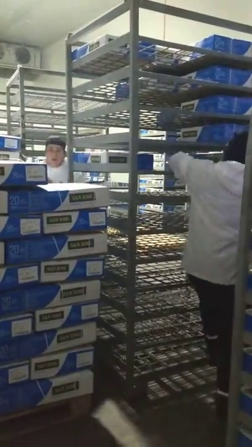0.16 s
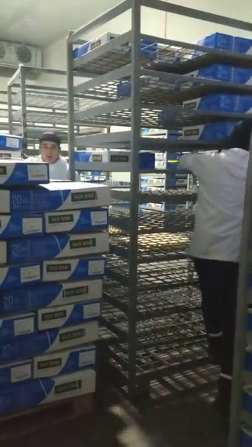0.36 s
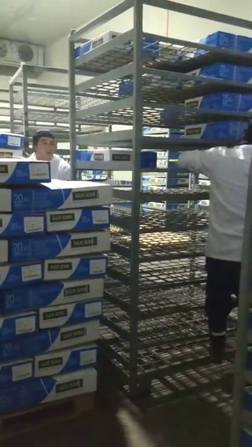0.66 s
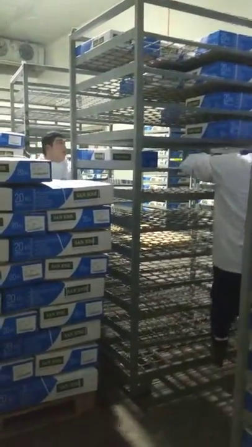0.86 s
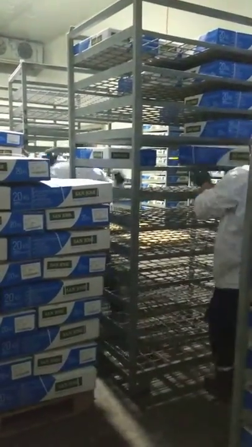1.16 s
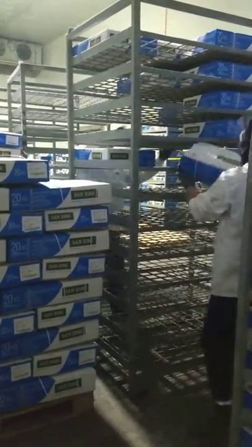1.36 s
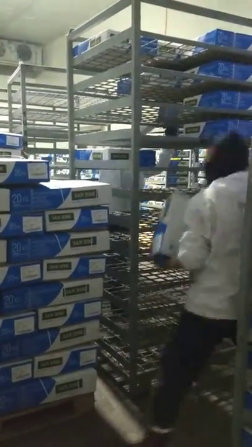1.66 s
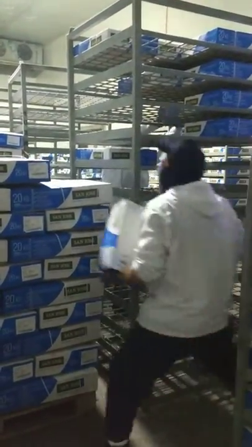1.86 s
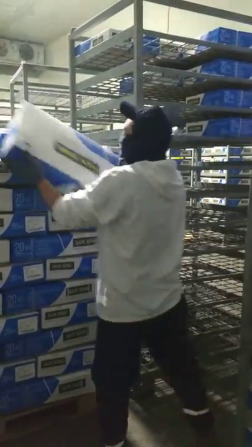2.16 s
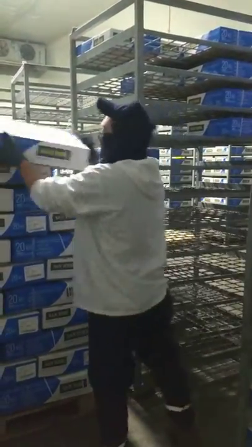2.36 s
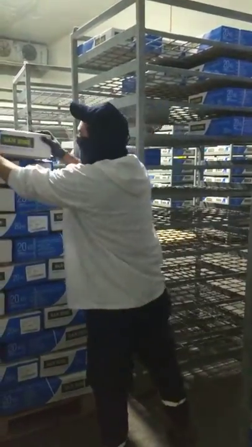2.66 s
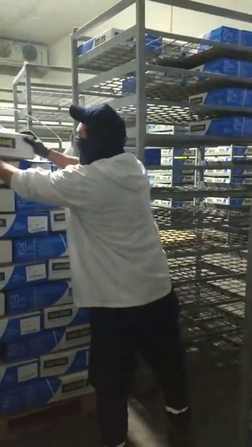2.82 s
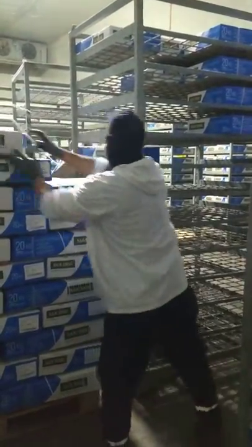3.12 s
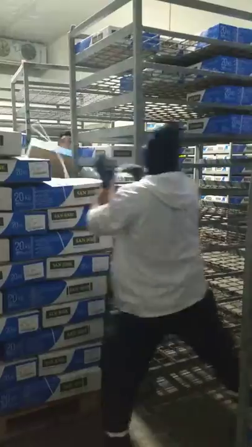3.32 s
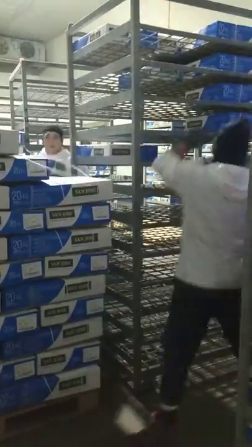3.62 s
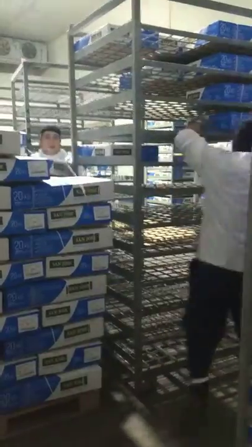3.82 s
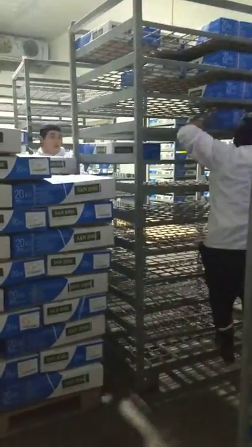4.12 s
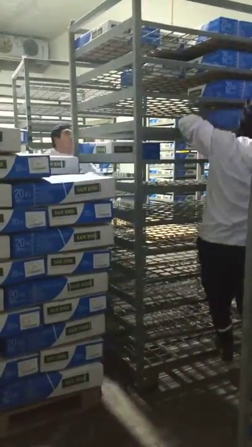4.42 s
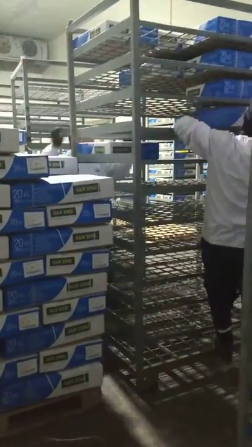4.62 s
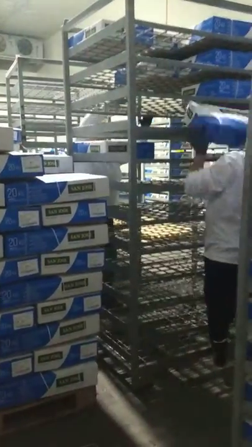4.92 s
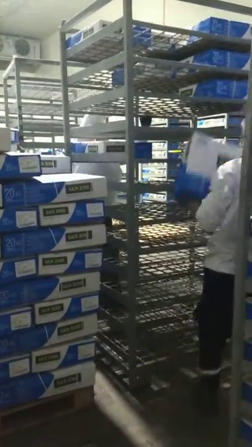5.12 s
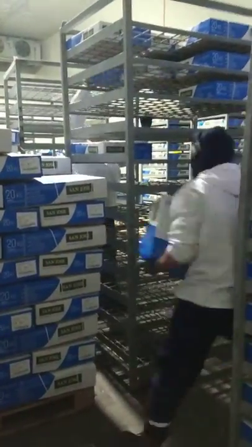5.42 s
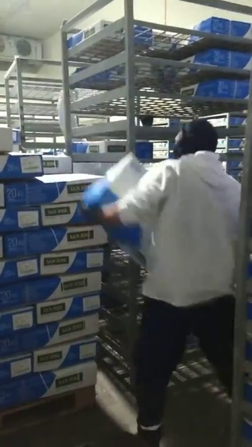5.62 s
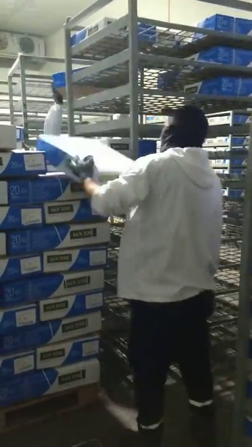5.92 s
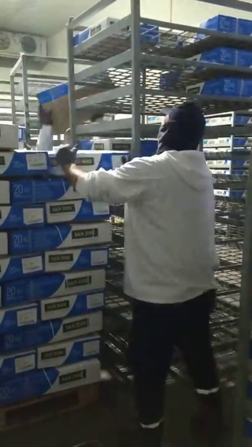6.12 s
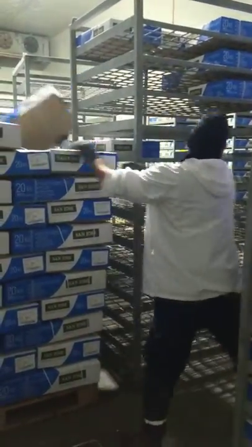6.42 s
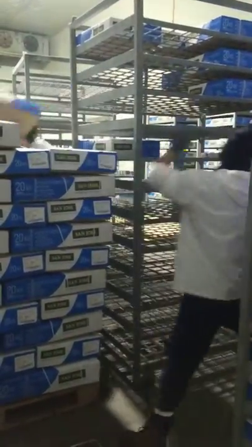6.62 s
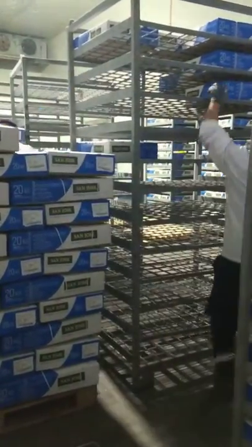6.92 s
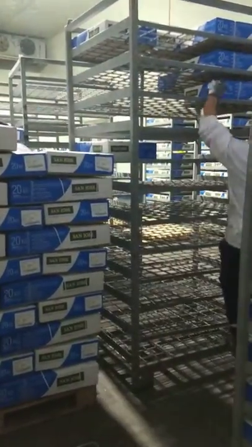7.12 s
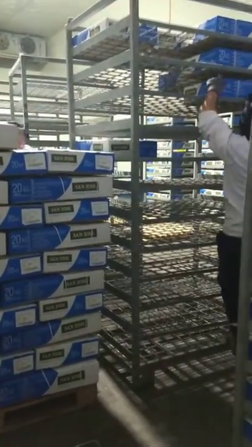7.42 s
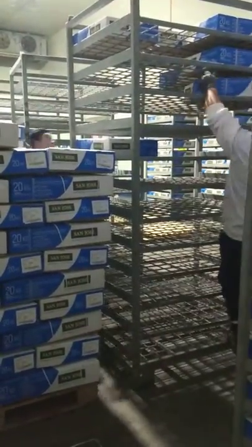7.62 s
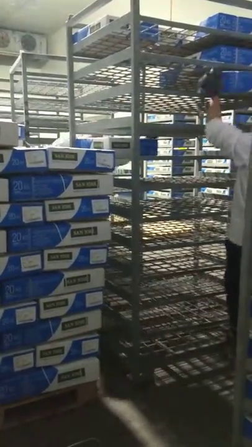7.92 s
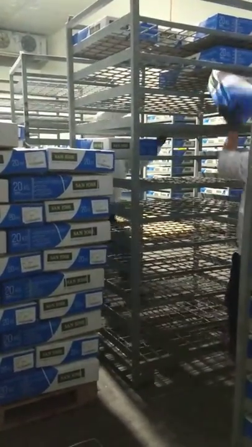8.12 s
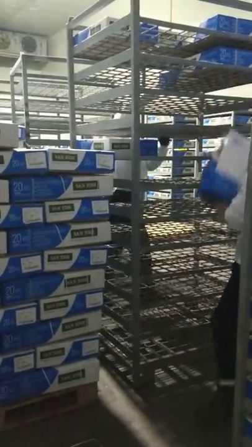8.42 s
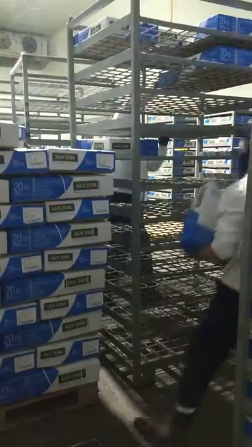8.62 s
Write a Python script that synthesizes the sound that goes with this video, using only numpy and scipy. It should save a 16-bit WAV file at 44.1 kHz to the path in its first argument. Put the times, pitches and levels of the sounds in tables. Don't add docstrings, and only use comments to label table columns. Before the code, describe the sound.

Workers' frozen boxes are dragged, knocked and stacked near a handheld phone. Brittle ice ticks, cardboard slaps and gritty scuffs lead to clumps of low thuds, the loudest around 2.5 and 6.8 seconds. A taut strap squeaks thinly after the first heavy landing. Steady evaporator fans hum and whoosh behind, dipping briefly after loud blows, while the metal room adds a short, hard ring.

```python
import sys
import numpy as np
from scipy import signal
from scipy.fft import rfft, irfft, next_fast_len
from scipy.io import wavfile
from scipy.ndimage import map_coordinates

SR = 44100
rng = np.random.default_rng(int(sys.argv[2]) if len(sys.argv) > 2 else 0)


def to_linear_factor(level_db):
    exponent = np.asarray(level_db, float) / 20
    return 10 ** exponent


def store_pcm(level_fs):
    pcm = np.round(np.clip(level_fs, -1, 1) * 32767).astype(np.int16)
    wavfile.write(sys.argv[1], SR, np.atleast_2d(pcm).T)


N = 386757


def unit(x):
    return x / np.sqrt(np.mean(x ** 2) + 1e-20)


def along(points, hz):
    f, *cols = np.transpose(points)
    return np.squeeze([np.interp(np.log(hz + 1), np.log(f + 1), c) for c in cols])


def curves(rows):
    s, *cols = np.transpose(rows)
    return [np.interp(np.arange(N) / SR, s, c) for c in cols]


def wobble(rate, size=N):
    at = np.arange(0, size + 8, 8)
    knots = rng.standard_normal(int(size * rate / SR) + 4)
    return np.interp(np.arange(size), at, map_coordinates(knots, [at * rate / SR]))


def filtered(x, response):
    m = next_fast_len(N + 8192)
    return irfft(rfft(x, m) * response(np.fft.rfftfreq(m, 1 / SR)), m)[..., :N]


def noise(spectrum):
    m = next_fast_len(N)
    hz = np.fft.rfftfreq(m, 1 / SR)
    re, im = rng.standard_normal((2, 2, len(hz)))
    return unit(irfft((re + 1j * im) * to_linear_factor(along(spectrum, hz)), m)[:, :N])


def tone(hz, width_hz, steady=0):
    size = len(hz)
    phase = 2 * np.pi * np.cumsum(hz) / SR
    cos, sin = np.cos(phase), np.sin(phase)
    pair = [cos * (steady + wobble(width_hz, size)) + sin * wobble(width_hz, size) for _ in range(2)]
    return unit(np.array(pair))


# start_s, level_db, pitch_hz, t60_s
THUDS = [(.5434, -15.5, 670, 0.033), (.852, -9, 218, 0.064), (.94, -16, 303, .05), (1.571, -10, 570, 0.039),
         (1.582, -7.5, 227, 0.06), (1.589, -14.5, 640, 0.062), (1.609, -8.5, 250, 0.04),
         (1.642, -11, 313, 0.069), (2.315, -11, 250, 0.073), (2.455, -15, 1160, .03),
         (2.4573, -8, 1550, 0.029), (2.466, -6.5, 300, 0.092), (2.474, -9, 275, 0.089),
         (2.4945, -14, 330, 0.033), (2.508, -8.5, 418, 0.056), (3.643, -11.5, 924, 0.027),
         (3.69, -7, 199, 0.044), (4.991, -14.5, 433, 0.37), (5.015, -13.5, 293.2, 0.34),
         (6.021, -8, 310, 0.036), (6.335, -18, 353, 0.33), (6.359, -15, 285, 0.083), (6.39, -22, 229, 0.33),
         (6.796, -16, 229, .06), (6.806, -8.5, 189, 0.079), (6.819, -15, 170, .07),
         (6.8285, -8.5, 802, 0.04), (6.8316, -6, 224, 0.038), (6.84, -12, 383, 0.051),
         (6.8433, -6.5, 125, 0.089), (6.865, -7, 330, 0.041), (6.90, -17, 168, 0.083)]


def thuds():
    out = np.zeros((2, N))
    t = np.arange(SR // 5) / SR
    for s, db, hz, t60 in THUDS:
        cycles = 0
        for ratio, gain in [(1, 0.64), (1.6, 0.19)]:
            channel_phase = [[0], [3.54 * ratio]]
            cycles = cycles - gain * np.sin(2 * np.pi * ratio * hz * t + channel_phase)
        contact = 1 - np.exp(-t / 0.0012)
        spot = out[:, round(s * SR):][:, :len(t)]
        spot += to_linear_factor(db + 2.0 - 60 * t / t60) * contact * cycles
    return out


# start_s, peak_db, pitch_hz, cycles
SLAMS = [(1.5652, -6.5, 400, 1.7), (1.6137, -10, 300, 1.1), (1.7375, -14, 724, 3), (2.2105, -12.5, 786, 3),
         (2.4589, -.5, 640, 2.1), (3.6409, -5, 355, 2.35), (3.6502, -3.5, 300, 1.45), (4.6755, -18, 740, 3),
         (7.312, -18, 800, 2.5), (6.8322, -9, 420, 1.2), (6.8418, -7, 300, 1.2)]


def slams():
    out = np.zeros((2, N))
    for s, db, hz, cycles in SLAMS:
        turns = np.arange(round(cycles / hz * SR)) * hz / SR
        swell = np.sin(np.pi * turns / cycles) ** .65
        spot = out[:, round(s * SR):][:, :len(turns)]
        spot -= to_linear_factor(db) * swell * np.sin(2 * np.pi * turns - 1.1 + [[0], [3.5]])
    return out


# freq_hz, density_db
CRACK = [(1800, -8), (2600, 8.5), (5000, 8), (7000, -1), (10000, -15), (16500, -40)]
CARD = [(700, -4.5), (1000, -3.5), (1400, -5), (2100, -2), (2450, -9.5), (2800, -27.5)]
FROST = [(4000, -10), (6000, -1.5), (7500, -2.5), (10000, -3.5), (13000, -5.5), (16500, -6)]
# start_s, crack_db, slap_db, frost_db
CATCHES = [(0.326, -41, -29, -41), (1.022, -13, -39, -28.5), (1.5759, -27, -23.5, -51),
           (2.211, -38, -27, -55), (2.349, -22, -18, -37), (2.375, -24, -27, -45), (2.7162, -25, -33, -44),
           (3.6395, -20, -24.5, -36.5), (3.895, -29, -38, -49), (4.4208, -18, -19.5, -34.5),
           (4.9822, -24, -26, -44), (5.02, -26, -20, -51), (5.2989, -25, -23.5, -50),
           (5.98, -29, -20.5, -50), (6.027, -22, -27, -39), (6.365, -25, -23.5, -41),
           (6.4716, -32, -32, -63), (6.837, -19, -16, -40), (7.2075, -38, -35, -47),
           (7.2734, -24, -22, -38.5), (8.0544, -30, -30, -54), (8.1994, -30, -31, -46),
           (8.66, -25.5, -32, -36.5)]
# start_s, crack_db, slap_db, frost_db
SNAPS = [
    (0.742, -19, -23, -40),
    (0.974, -22, -23, -32),
    (1.035, -17.5, -14.5, -39),
    (2.459, -8.5, -11, -36),
    (6.1956, -22, -31, -28),
    (7.3128, -15, -21, -34.5),
    (8.691, -26, -18, -50),
]
# start_s, crack_db, frost_db
CLICKS = [(.154, -37, -52), (0.2508, -30, -60), (0.317, -26, -49), (0.977, -23, -36), (2.1834, -26, -44),
          (2.235, -15.5, -37), (2.2886, -20, -42), (2.326, -14, -40), (2.376, -19, -40), (3.6321, -25, -35),
          (4.9646, -36, -42), (5.981, -28, -47), (6.022, -17, -28), (6.172, -31, -30), (6.1953, -29, -29),
          (6.811, -25, -35), (7.213, -34, -42), (7.219, -38, -48)]
# start_s, crack_db, frost_db
TICKS = [(.5434, -32, -53), (.8494, -24.5, -44), (1.7375, -48, -59), (1.7609, -38, -56), (2.1864, -29, -54),
         (2.2897, -22, -43), (2.4744, -28, -38), (3.53, -33, -42.5), (3.603, -31, -39), (3.8194, -30, -47),
         (4.1596, -37, -49), (4.6754, -49, -59), (5.5194, -33, -45), (5.816, -19.5, -52),
         (6.1194, -39, -47), (6.798, -38, -51)]


def catches():
    swell_s = 0.0056
    click_slap_db, tick_slap_db = -3, -31
    rows = [(*row, 0.069, swell_s) for row in CATCHES]
    rows += [(*row, 0.033, swell_s) for row in SNAPS]
    rows += [(s - .002, db, db + click_slap_db, frost_db, 0.014, .0007) for s, db, frost_db in CLICKS]
    rows += [(s, db, db + tick_slap_db, frost_db, 0.14, swell_s) for s, db, frost_db in TICKS]
    crack, slap, frost = np.zeros((3, N))
    t = np.arange(N) / SR
    for s, crack_db, slap_db, frost_db, t60, swell in rows:
        at = slice(round((s - .05) * SR), round((s + .25) * SR))
        after = t[at] - s - .002
        shape = to_linear_factor(9 * np.minimum(after, 0) / swell - 60 * np.maximum(after, 0) / t60)
        crack[at] += to_linear_factor(crack_db - 6.0) * shape
        slap[at] += to_linear_factor(slap_db - 1.0) * shape
        frost[at] += to_linear_factor(frost_db + 9.0) * shape
    return crack * noise(CRACK) + slap * noise(CARD) + frost * noise(FROST)


# start_s, held_s, rasp_db, card_over_rasp_db, frost_over_rasp_db
DRAGS = [(.5, 0.13, -45.5, -4, 8), (.63, 0.091, -35.5, 1.5, 2), (.83, 0.14, -42.5, 10.5, 4.5),
         (1.02, 0.052, -39.5, 2.5, -21), (1.25, 0.076, -48.5, 9, -14), (2.2, 0.2, -34.5, 1, 0),
         (2.62, 0.23, -41, 4, 0.5), (2.948, 0.059, -46.5, 4, -17), (3.61, 0.036, -43.5, 2, 1),
         (3.69, 0.082, -39.5, 5, -2), (4.34, 0.14, -39, 4, -2), (4.6, 0.13, -45, 8.5, -1.5),
         (4.78, 0.067, -44, 2, 3), (4.98, 0.17, -37.5, 8.5, -22), (5.27, 0.16, -37.5, 4.5, -1.5),
         (5.813, 0.067, -34.5, -1, 4), (5.96, 0.051, -37, 6.5, 1), (6.83, 0.04, -38.5, 3.5, -3),
         (6.98, 0.12, -47.5, 11.5, -8), (7.22, 0.15, -37, 1.5, -8), (7.45, 0.21, -44.5, 7, -2.5),
         (7.85, 0.21, -42.5, 2.5, 1.5), (8.45, 0.032, -42.5, 6.5, 0)]
# start_s, rasp_db, card_over_rasp_db, frost_over_rasp_db
SCUFFS = [(.16, -49.5, 9, -13), (.33, -40, 0, 5), (.995, -42, 0, -8), (1.33, -54, 0, 1),
          (1.55, -48.5, 4, 3), (1.59, -39.5, 5.5, -4), (2.13, -51, 0, 5), (4.06, -50, 0, 4),
          (6.735, -59, 0, 12), (1.76, -40.5, 4, -3), (1.95, -42, 7.5, -1.5), (2.52, -41, -10, -3),
          (3.44, -50, -1, 6), (3.535, -46.5, -5, 7), (3.92, -42.5, 8.5, -2), (4.16, -46.5, 3, 8),
          (4.23, -41, 4, 1), (6.12, -52, -14, 20), (6.18, -33.5, 0.5, 4.5), (6.37, -49, 11, -18),
          (6.5, -48.5, 6.5, -23), (7.67, -46, 8.5, 4), (8.21, -42.5, -6, 0), (8.67, -45, 2, 4),
          (8.77, -37.5, -8, -5)]
# rasp_db, card_db, frost_db
STILL_DB = (-72, -64, -70)


def pulls():
    t = np.arange(0, N, 64) / SR
    pace = np.array([[1], [1], [1.6]])
    rows = [(*row, 100, 39) for row in DRAGS]
    rows += [(s, 0, *levels, 285, 46) for s, *levels in SCUFFS]
    power = to_linear_factor(2 * np.array(STILL_DB))[:, None]
    for s, held, db, card_db, frost_db, rise, fall in rows:
        away = rise * np.maximum(s - t, 0) + fall * np.maximum(t - s - held, 0)
        peak_db = db + np.array([[0], [card_db], [frost_db]])
        power = power + to_linear_factor(2 * (peak_db - pace * away))
    return [np.interp(np.arange(N) / SR, t, 10 * np.log10(p)) for p in power]


# freq_hz, density_db
RASP = [(1700, -36), (2300, 4), (3500, -0.5), (5000, -4.5), (6500, -7), (9000, -16), (16000, -32)]
# rasp_db, card_db, frost_db
FAR_DB = (-60.5, -52, -70)


def slides():
    rasp_db, card_db, frost_db = pulls()
    slip = wobble(35)
    grit = wobble(600)
    beds = noise(RASP), noise(CARD), noise(FROST)
    rasp = to_linear_factor(rasp_db + 2.0 + 0.77 * slip + 1.0 * grit) * beds[0]
    card = to_linear_factor(card_db + 1.0 * slip + 1.1 * wobble(60)) * beds[1]
    frost = to_linear_factor(frost_db - 0.5 + 1.0 * slip + 0.99 * grit) * beds[2]
    far = sum(to_linear_factor(db) * bed[:, ::-1] for db, bed in zip(FAR_DB, beds))
    return rasp + frost + card, far


# start_s, pitch_hz, level_db
CHIRP = [
    (2.395, 2780, -33),
    (2.415, 2880, -25),
    (2.44, 3000, -24.5),
    (2.48, 3280, -30),
]
SQUEAK_HIGH = [
    (2.49, 3050, -45),
    (2.55, 2950, -43),
    (2.62, 2870, -48),
    (2.70, 2810, -48),
    (2.74, 2760, -39),
    (2.81, 2720, -44),
    (2.96, 2660, -49),
    (3.005, 2680, -39),
    (3.05, 2710, -46),
    (3.42, 2670, -57),
]
SQUEAK_LOW = [
    [(2.30, 2230, -35), (2.34, 2230, -28.5), (2.38, 2220, -32), (2.46, 2210, -40)],
    [(2.82, 2140, -46), (2.88, 2170, -35.5), (2.96, 2200, -40), (3.02, 2230, -44), (3.1, 2180, -42),
     (3.25, 2180, -47), (3.45, 2200, -51)],
]
# start_s, pitch_hz, level_db
ZIP = [
    (7.2, 10000, -45),
    (7.212, 11200, -41),
    (7.226, 14000, -43),
]


def strap():
    lines = [(CHIRP, 700, .5), (SQUEAK_HIGH, 150, .8), (SQUEAK_LOW[0], 70, 1.3),
             (SQUEAK_LOW[1], 190, .6), (ZIP, 1500, .5)]
    out = np.zeros((2, N))
    for rows, width_hz, core in lines:
        s, hz, db = np.transpose(rows)
        first = round(s[0] * SR)
        t = np.arange(first, round(s[-1] * SR)) / SR
        fade = np.clip(np.minimum(t - s[0], s[-1] - t) / 0.0056, 0, 1)
        level = to_linear_factor(np.interp(t, s, db) + 1.2 * wobble(24.4, len(t)))
        out[:, first:][:, :len(t)] += fade * level * tone(np.interp(t, s, hz), width_hz, core)
    return out


# start_s, level_db
FANS = [(0, -31), (.54, -29), (.95, -27), (1.03, -36.5), (1.54, -32.5), (1.59, -29), (2.0, -29.5),
        (2.25, -26.5), (2.7, -35.5), (3.5, -28.5), (3.9, -34.5), (5.08, -26), (5.85, -27.5), (6.4, -32),
        (6.76, -34.5), (6.83, -25), (7.13, -35.5), (8.2, -26)]
# freq_hz, density_db
AIR = [(20, -45), (30, -22), (45, -9.5), (85, -7.5), (110, -2.5), (200, -1.5), (400, -2), (540, -9),
       (740, -4), (1000, -19.5), (1900, -22.5), (3000, -35.5), (8000, -53), (16000, -52)]
# multiple_of_blade_tone, over_rush_db, width_hz
ORDERS_DB = [(.667, -21.5, 9), (1.34, -15.5, 9), (1.52, -7.5, 11), (2, -11.5, 9), (3, -14.5, 16)]
# start_s, pitch_hz
BLADE = [(0.0, 148), (0.24, 143.3), (0.39, 147.4), (0.85, 144.6), (2.42, 145.9), (6.13, 147.6),
         (6.57, 144.4), (8.77, 147.5)]
# centre_s, blade_over_rush_db, half_length_s
BEATS = [(.03, 0.5, 0.16), (0.35, 5, 0.015), (0.563, 1, 0.078), (.73, -2, 0.071), (0.87, -6, 0.026),
         (1.194, 0, 0.21), (1.604, 3, 0.15), (2.14, 1, 0.13), (2.729, 5.5, 0.19), (3.043, -1.5, 0.21),
         (3.457, 6, 0.24), (4.018, -0.5, 0.17), (4.209, -4, 0.032), (4.35, -13, .04), (4.57, -8, .07),
         (4.853, 2.5, 0.15), (5.026, -6, .07), (5.257, -4, .08), (5.501, 5.5, 0.086), (5.75, 4.5, 0.089),
         (6.119, -3.5, 0.11), (6.328, -4, 0.081), (6.707, -5, 0.11), (6.922, -9, 0.06), (7.05, -10, 0.02),
         (7.33, 2.5, 0.16), (7.805, 1.5, 0.11), (8.098, -9, 0.34), (8.465, 4, 0.19), (8.751, 1.5, 0.14)]


def fans():
    rush_db, = curves(FANS)
    hz, = curves(BLADE)
    t = np.arange(0, N, 64) / SR
    beat = to_linear_factor(-9)
    for s, db, half in BEATS:
        beat = beat + to_linear_factor(db) * np.exp(-((t - s) / half) ** 2)
    beat = np.interp(np.arange(N) / SR, t, beat)
    air = to_linear_factor(0.68 * wobble(14) + 1.25 * wobble(3.07)) * noise(AIR)
    phase = 2 * np.pi * np.cumsum(hz + 1.19 * wobble(8)) / SR
    blade = np.sqrt(2) * np.array([np.sin(phase), np.cos(phase + 0.41 * wobble(5))])
    orders = sum(to_linear_factor(db) * tone(k * hz, width) for k, db, width in ORDERS_DB)
    return to_linear_factor(rush_db + 3.5) * (air + orders) + to_linear_factor(rush_db - 1.5) * beat * blade


# freq_hz, t60_s
STORE = [(200, 1), (2000, 0.51), (10000, 0.32)]


def store(x):
    hz, t, z = signal.stft(rng.standard_normal((2, SR // 2)), SR, nperseg=256)
    decay = to_linear_factor(-60 * t / along(STORE, hz)[:, None])
    tail = signal.istft(z * decay, SR, nperseg=256)[1]
    late = np.pad(x, ((0, 0), (300, 0)))
    return signal.fftconvolve(late, tail / np.linalg.norm(tail[0]), axes=1)[:, :N]


NULLS = [0, 2340, 4730, 6900, 9320, 11750, 14050, 16500]
# freq_hz, subtracted_share, sum_over_difference_db, likeness, lead_rad
PORTS = [(30, 0.85, 25, .3, 2.9), (60, 0.82, 18.5, .2, -6.5), (145, 0.92, 20.5, 0.31, 4.5),
         (250, 0.89, 14, 0.3, 1), (410, 0.66, 4, 0.27, 2.5), (605, 0.91, 4, 0.52, 1.8),
         (980, 0.79, 5.5, 0.33, 1.5), (1915, 0.32, -3.5, 0.23, 2.5), (2150, 0.69, -2.5, 0.27, 1.5),
         (2640, 0.5, 2.8, 0.13, 4.5), (3060, 0.81, -1, 0.15, -3), (5300, 0.69, 1.6, 0.22, 10),
         (7100, 1, 3.5, 0.56, 0), (8800, 0.27, -0.2, 0.27, 1), (15000, 0.44, 0, 0.31, 1.5)]


def ports(fields):
    m = next_fast_len(N + 8192)
    hz = np.fft.rfftfreq(m, 1 / SR)
    base, tilt_db, alike, lead = along(PORTS, hz)
    treble = (1 - 1 / (1 + (hz / 2900) ** 10)) / (1 + (hz / 9500) ** 10)
    alike = np.clip(alike + (.72 - alike) * treble, 0, 1)
    lead = np.exp(1j * lead * (1 - treble))
    ears = 0
    for x, cancel, shift_hz in fields:
        a, b = rfft(x, m)
        share = np.clip(base + cancel * (1 - base) / (1 + (hz / 11000) ** 4), 0, 1)
        turns = np.interp(hz, NULLS + shift_hz * np.sign(NULLS), np.arange(len(NULLS)))
        late = share * np.exp(-2j * np.pi * turns)
        mid, side = to_linear_factor(tilt_db) * (1 - late), 1 + late
        norm = np.hypot(abs(mid), abs(side))
        if cancel > 0:
            mid = mid * (1 - .9 * np.exp(-((hz - NULLS[1] - shift_hz) / 290) ** 2))
        mid = a * mid / norm
        side = side * (a * alike * lead + b * np.sqrt(1 - alike ** 2)) / norm
        ears = ears + np.array([mid + side, mid - side])
    return irfft(ears, m)[:, :N]


def scene():
    snaps = catches()
    blows = thuds() + slams()
    scrape, far = slides()
    near = scrape + snaps + blows
    room = to_linear_factor(-7.5) * store(snaps + to_linear_factor(-7) * blows)
    diffuse = fans() + strap() + far + room
    turn = (1 + np.tanh(3.0 * wobble(4))) / 2
    near_cancel, diffuse_cancel, wander_hz = .9, -.75, 60
    return ports([(diffuse, diffuse_cancel, 0),
                  (near * (1 - turn), near_cancel, -wander_hz),
                  (near * turn, near_cancel, wander_hz)])


# start_s, depth_db, held_s, recovery_s
DUCKS = [
    (0.978, 4, .01, 0.29),
    (2.385, 4.5, .01, 0.17),
    (2.50, 1, .01, 0.084),
    (3.661, 1.5, .01, 0.096),
    (6.04, 4, .01, 0.29),
    (6.197, 8, 0.12, 0.055),
    (6.535, 2.5, .01, 0.078),
]


def gain_control(x):
    t = np.arange(N) / SR
    down_db = 0
    for s, db, held, back in DUCKS:
        down_db = down_db + db * (t > s) * np.exp(-np.maximum(t - s - held, 0) / back)
    return x * to_linear_factor(-down_db)


def roll_off(x):
    return signal.sosfilt(signal.butter(12, 15970, fs=SR, output="sos"), x)


def record(dry):
    ears = gain_control(dry)
    ears = ears / (1 + np.abs(ears / 2.4) ** 6) ** (1 / 6)
    ears = filtered(ears, lambda hz: (hz < 15850) * (1j * hz / (42 + 1j * hz)) ** 3)
    return roll_off(ears)


dry = scene()
out = record(dry)
store_pcm(out)
```